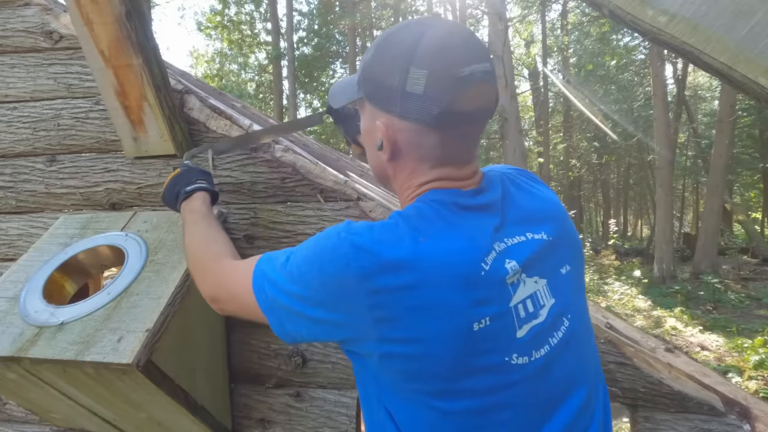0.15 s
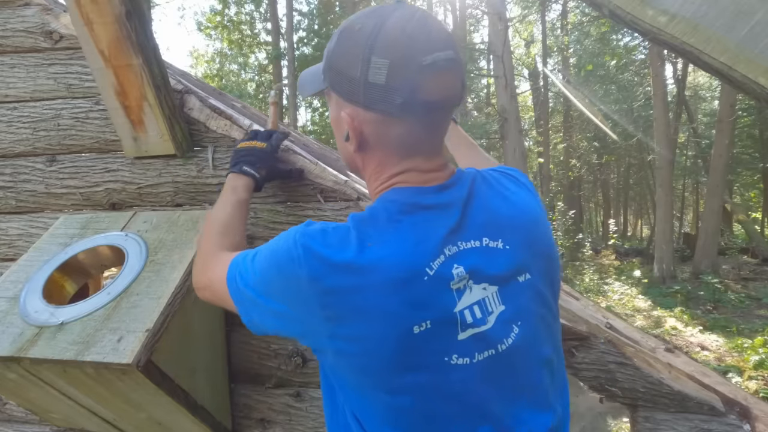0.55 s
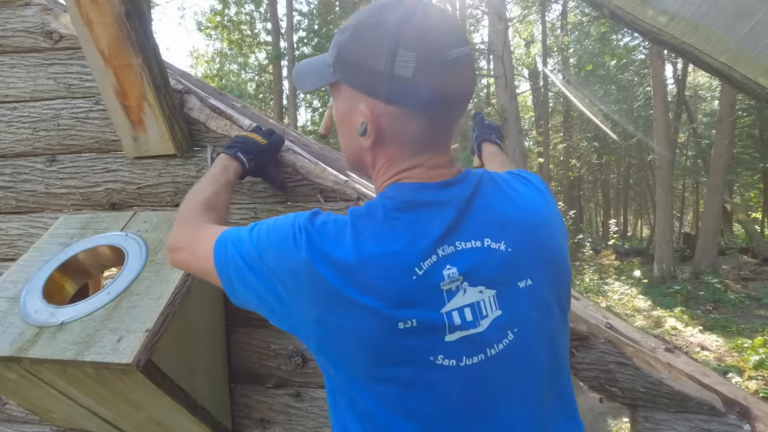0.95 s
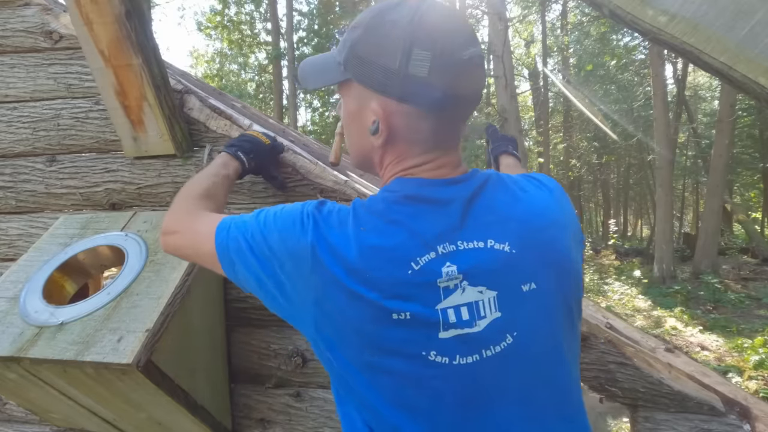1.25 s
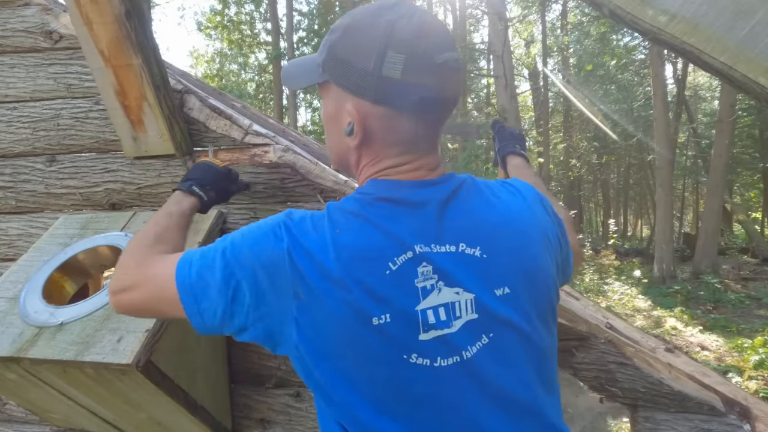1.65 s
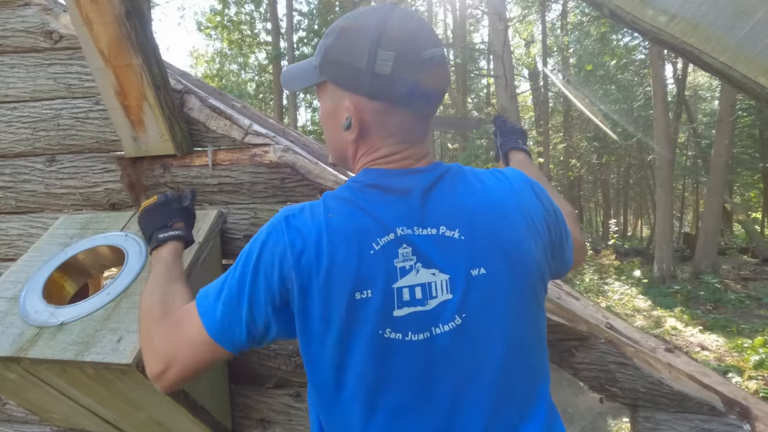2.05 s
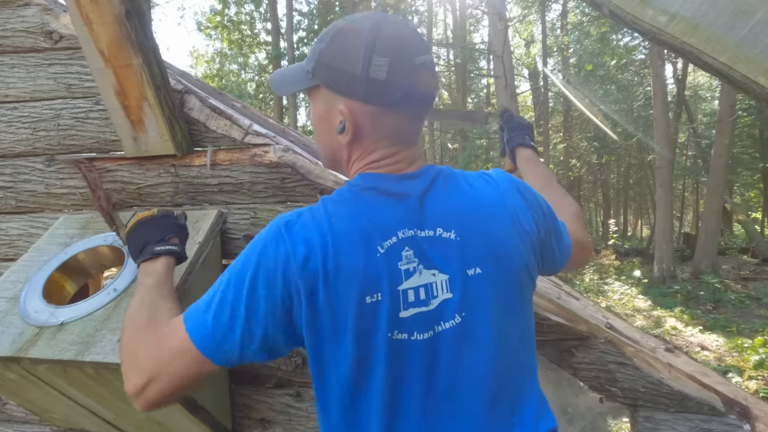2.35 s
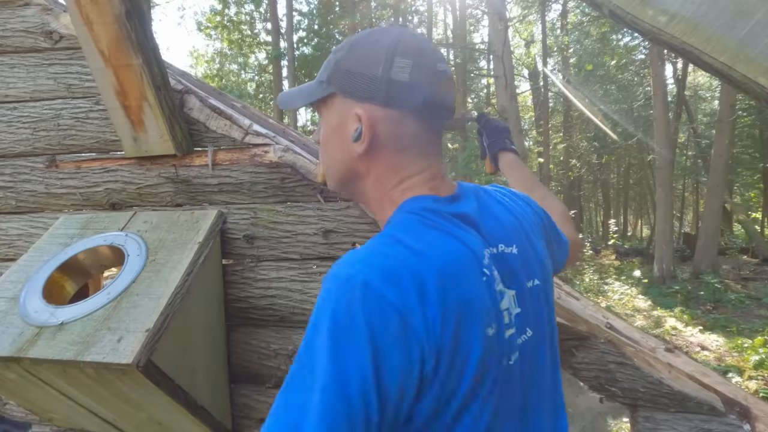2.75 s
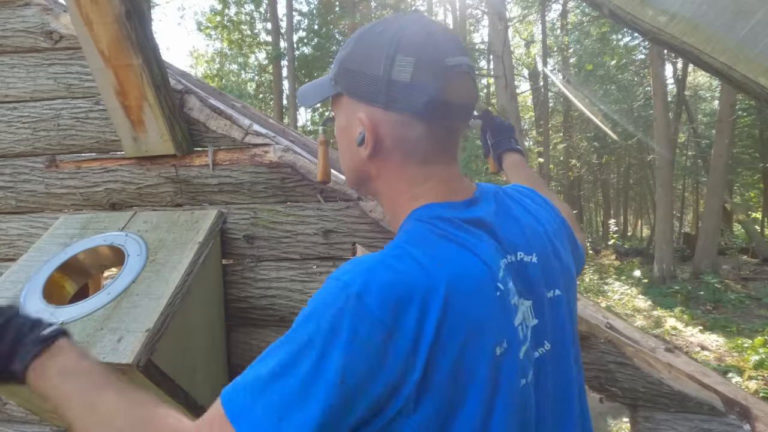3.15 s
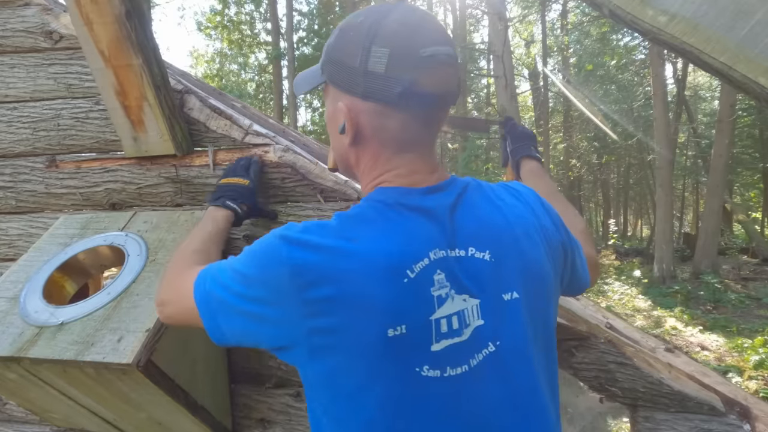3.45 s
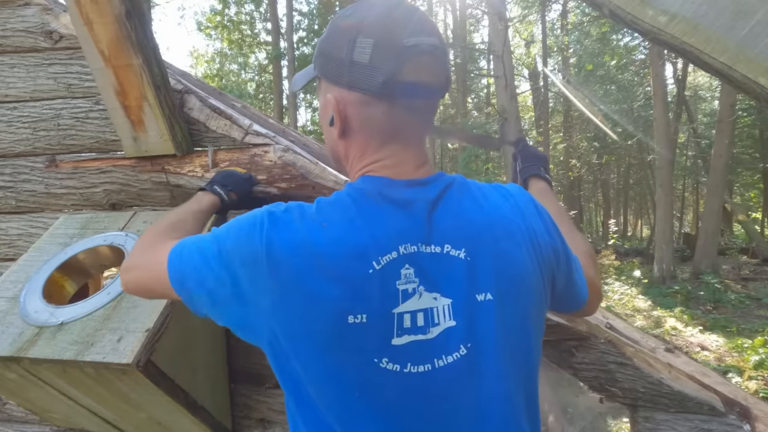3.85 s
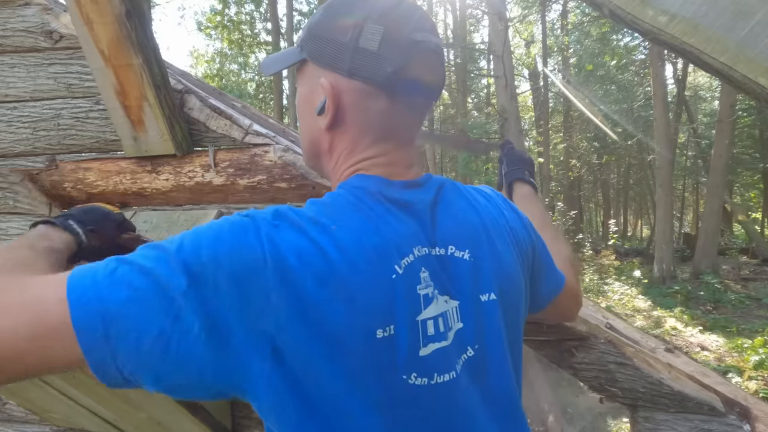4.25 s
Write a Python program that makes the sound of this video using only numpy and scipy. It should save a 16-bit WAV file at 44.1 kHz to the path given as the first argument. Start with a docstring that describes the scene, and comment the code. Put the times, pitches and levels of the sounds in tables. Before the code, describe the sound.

Gloved hands pry and tear dry bark from a log wall outdoors. Faint low creaks and small ticks come first, then clusters of sharp cracks, a big splintering rip with thuds around two seconds, one hard snap, a quieter lull, and a final dense run of loud breaks. A small camera microphone about a metre away catches it dry and close over faint leaf rustle and low rumble.

```python
"""Tearing bark off a log wall

Dry strips of bark and wood are torn by hand off a log wall in a quiet forest, a metre from a small camera.
Breaking fibres are noise bursts that excite the resonances of the strip; random grains make the dense
crackle, rustle and creak of each pull. Blows ring the logs with a sagging pitch, and rubbing grains ring
hollow modes. Shaped noise gives the faint rustle and rumble beneath; the treble mostly favours the left port.
"""
import sys
import numpy as np
from scipy import signal
from scipy.fft import rfft, irfft
from scipy.io import wavfile
from scipy.ndimage import uniform_filter1d

SR = 44100
rng = np.random.default_rng(int(sys.argv[2]) if len(sys.argv) > 2 else 0)


def digitize_waveform(pressure):
    """Quantize a signal to 16-bit integers and store it at the path in sys.argv[1].

    Rows of a 2-D input are taken as channels; values are limited to [-1, 1].
    """
    field = np.atleast_2d(pressure).T
    bounded = np.clip(field, -1, 1)
    quanta = np.round(bounded * 32767).astype(np.int16)
    wavfile.write(sys.argv[1], SR, quanta)


N = 193863  # length in samples


def undb(db):
    """Level definition: an amplitude ratio is ten to the power of dB / 20."""
    return 10 ** (np.asarray(db) / 20)


def unit(x):
    """Normalisation to a root-mean-square amplitude of one."""
    return x / np.sqrt(np.mean(x ** 2))


def curve(table):
    """Linear interpolation of a table's columns against time, one value a sample."""
    s, *columns = np.transpose(table)
    t = np.arange(N) / SR
    return [np.interp(t, s, c) for c in columns]


def shape(x, points):
    """Linear filtering in the frequency domain, through (f/Hz, level/dB) points on a log frequency axis."""
    hz, db = np.transpose(points)
    length = x.shape[-1]
    f = np.arange(length // 2 + 1) * SR / length + 1  # +1 Hz keeps the logarithm finite
    gain = undb(np.interp(np.log(f), np.log(hz), db))
    return irfft(rfft(x) * gain, length)


def ring(x, modes):
    """Modal superposition: parallel resonances of (f/Hz, bandwidth/Hz, level/dB)."""
    out = 0
    for hz, width, db in modes:
        b, a = signal.iirpeak(hz, hz / width, SR)
        out = out + undb(db) * signal.lfilter(b, a, x)
    return out


def dull(x, hz):
    """Internal damping: wood absorbs what lies well above its ring, a second-order low-pass."""
    return signal.sosfilt(signal.butter(2, hz, fs=SR, output="sos"), x)


def add(out, s, piece, db):
    """Superposition: mix a piece in at s seconds with the given peak level."""
    i = int(s * SR)
    piece = piece[:N - i]
    out[i:i + len(piece)] += piece * undb(db) / np.max(np.abs(piece))


def grains(rate, spread_db, tail_s):
    """Shot noise: random tiny breaks, rate per second, a few far louder; their power decays over tail_s."""
    loudness_db = spread_db * np.minimum(rng.exponential(size=N), 2.4)
    hits = (rng.random(N) < rate / SR) * undb(loudness_db)
    power = signal.lfilter([1], [1, -np.exp(-1 / (tail_s * SR))], hits ** 2)
    return np.sqrt(power) * rng.standard_normal(N)


# spectrum of distant leaves and air: f/Hz, relative level per Hz/dB
FOREST_SPECTRUM = [(15, -1), (25, 18), (47, 3), (97, -20.5), (153, 1), (206, -5), (659, -35.5),
                   (1290, -21.5), (3920, -26), (5730, -29.5), (9320, -49), (13200, -43), (16000, -88)]
# swell and fade of the deepest bass: t/s, gain/dB
RUMBLE_SWELL = [(0, -1.5), (.5, 3.5), (1.1, -9), (1.6, -7), (2.1, 3.5), (2.7, -3), (3.4, 3), (4.4, -11)]
FOREST_DB = -49.5  # rms level of the part common to both ports


def forest():
    """Diffuse field: coloured noise of leaves and air, with a part that differs between the ports."""
    mid, side = shape(rng.standard_normal((2, N)), FOREST_SPECTRUM)
    swell_db, = curve(RUMBLE_SWELL)
    mid = mid + (undb(swell_db) - 1) * dull(mid, 200)
    side = shape(side, [(25, -14.5), (100, -17.5), (1000, -8.5), (8000, -13.0)])
    return undb(FOREST_DB) * np.array([mid + side, mid - side]) / np.std(mid)


def sag(t, hz):
    """Falling resonance: a ring starts half again too high, sinks to hz and dies within a few cycles."""
    cycles = hz * t
    phase = 2 * np.pi * (cycles + 0.8 * (1 - np.exp(-cycles / 1.6)))
    return np.sin(phase) * np.exp(-cycles / 3)


# dull blows on the logs: t/s, peak level/dB, f/Hz
BLOWS = [(0.0, -27.5, 207), (0.01, -25.5, 53.6), (0.089, -35, 168), (0.315, -42, 190), (0.422, -38, 176),
         (0.572, -33, 60), (0.603, -30, 68.3), (1.608, -29.5, 334), (2.029, -30, 30), (2.15, -26.5, 105),
         (2.177, -20, 167), (2.24, -18, 100), (2.406, -34, 236), (2.7, -15.5, 218), (2.712, -33, 61.8),
         (2.781, -30.5, 57.3), (2.858, -29, 248), (3.08, -33.5, 170), (3.215, -36, 187), (3.749, -22, 252),
         (3.934, -25, 230), (4.032, -22, 100.5), (4.21, -35, 243)]
# resonances of a log: f/Hz, bandwidth/Hz, relative level/dB
LOG_MODES = [(55, 23, -2.5), (94.5, 5.6, -2), (154.3, 54, -4), (211.3, 29, -5), (451, 41, -14)]


def thuds():
    """Impact excitation: a soft push rings the log; the struck spot sags in pitch as the contact spreads."""
    out = np.zeros(N)
    t = np.arange(int(.25 * SR)) / SR
    for s, db, hz in BLOWS:
        push = t / .0007 * np.exp(1 - t / .0007)  # greatest after 0.7 ms
        scrape = .4 * np.exp(-t / .02) * rng.standard_normal(len(t))
        log = unit(ring(push + scrape, LOG_MODES))
        add(out, s, dull(unit(sag(t, hz)) + 0.57 * log, 770), db)
    return out


# rubs of the loosened strip: t/s, length/s, peak level/dB, f/Hz
RUBS = [(0, 0.013, -30.5, 1330), (0.095, 0.024, -28.5, 1060), (0.627, 0.032, -33, 930),
        (2.319, 0.09, -29.5, 1340), (3.929, 0.16, -21.5, 1294), (4.024, 0.051, -26, 1297)]
# hollow modes of the loosened strip: multiple of the rub's pitch, relative level/dB
HOLLOW_MODES = [(.78, -5.5), (1.001, 2), (1.169, -7), (1.4, -12), (2.2, -17)]


def groans():
    """Stick-slip friction: grains ring the hollow modes, fading as the rub ends."""
    out = np.zeros(N)
    rub = grains(1200, 1.5, .002)
    for s, length, db, hz in RUBS:
        piece = rub[int(s * SR):int((s + length) * SR)]
        piece = piece * np.geomspace(1, .03, len(piece))
        piece = np.pad(piece, (0, SR // 50))  # room for the modes to ring on
        tone = 0
        for multiple, mode_db in HOLLOW_MODES:
            f = multiple * hz
            mode = ring(ring(piece, [(f, 90, 0)]), [(f, 300, 0)])
            tone = tone + undb(mode_db) * mode
        add(out, s, tone, db)
    return out


# tugs on the strip: t/s of the peak, build-up/s, fade/s, then crackle, rustle and creak rms level/dB
TUG_EVENTS = [(0.002, .01, 0.057, -44, -79, -24), (0.109, 0.033, 0.061, -46, -74, -30.5),
              (0.199, 0.077, 0.083, -55.5, -78, -43), (0.618, 0.065, 0.12, -44.5, -67, -34.5),
              (.8, 0.11, 0.2, -62, -61.5, -53), (1.1, 0.85, 0.6, -59, -67.5, -79),
              (1.218, 0.044, 0.079, -44.5, -61, -48), (1.346, 0.075, 0.46, -44.5, -54.5, -39.5),
              (1.495, 0.1, 0.17, -46, -49.5, -55), (1.572, 0.077, 0.24, -39, -45.5, -38),
              (1.693, 0.081, 0.046, -43, -51.5, -40), (1.891, 0.078, 0.15, -50, -48, -54),
              (1.96, 0.12, 0.16, -46, -46, -56), (2.021, 0.071, 0.25, -35, -39.5, -36.5),
              (2.196, 0.16, 0.071, -30, -30.5, -29.5), (2.242, 0.01, 0.055, -34.5, -39.5, -22),
              (2.321, 0.015, 0.15, -47, -61, -44), (2.393, 0.17, 0.66, -57.5, -60.5, -53),
              (2.698, 0.031, 0.04, -33, -27, -44), (2.736, 0.097, 0.27, -48.5, -59, -35.5),
              (2.915, 0.24, 0.13, -58, -49, -40.5), (3.16, 0.89, 0.59, -62, -58, -57),
              (3.537, 0.027, 0.13, -48.5, -37.5, -42.5), (3.762, 0.17, 1, -46.5, -50, -43),
              (3.944, 0.062, 0.13, -31.5, -36, -29), (4.045, 0.14, 0.11, -36, -39.5, -35.5),
              (4.24, 0.47, 0.095, -45, -45, -39), (4.313, 0.022, 0.35, -38, -38, -38),
              (4.39, 0.13, 0.01, -25, -28, -31.5)]
# hands resting on the bark: crackle, rustle and creak rms level/dB
IDLE_LEVELS = [-100, -79.5, -68]
TUG_RANGE_DB = 25  # rise over the build-up time, fall over the fade time


def pull():
    """Exponential envelopes added as power: each tug rises and falls at a steady rate in dB."""
    t = np.arange(N) / SR
    power = undb(IDLE_LEVELS)[:, None] ** 2 * np.ones(N)
    for s, build, fade, *db in TUG_EVENTS:
        away = np.where(t < s, (s - t) / build, (t - s) / fade)
        power = power + np.outer(undb(db) ** 2, undb(-TUG_RANGE_DB * away) ** 2)
    return np.sqrt(power)  # gains of crackle, rustle and creak


SPOT_WIDTH, SPOT_DB = 0.42, -6.5  # bandwidth as a share of pitch; level of all spots against the rest


def spots(points, count):
    """Local resonance: separate spots break independently, each ringing a band of its own."""
    total = 0
    for hz in np.geomspace(points[0], points[1], count):
        band = ring(grains(45, 4.5, .0009), [(hz, SPOT_WIDTH * hz, 0)])
        total = total + band / np.sqrt(hz)  # offsets the wider bands of higher spots
    return unit(total)


# resonances of the whole strip: f/Hz, bandwidth/Hz, relative level/dB
STRIP_MODES = [(612, 49, -2), (1050, 11, -2.5), (1333, 660, -4.5), (2140, 1800, -5.5)]
# bright colour of rustle and snaps: f/Hz, level/dB
RUSTLE_COLOUR = [(2500, -15), (4000, -8.5), (7300, -10), (8300, -18.5), (12500, -21)]


def tearing():
    """Acoustic emission: countless parting fibres give wooden crackle, dry rustle and a low creak in the log."""
    crackle_gain, rustle_gain, creak_gain = pull()
    breaks = grains(260, 3.4, .0009)
    scuffs = grains(150, 3.5, .0015)
    wooden = unit(dull(ring(breaks + scuffs, STRIP_MODES), 3400))
    crackle = wooden + undb(SPOT_DB) * spots((600, 3800), count=7)
    dry_noise = unit(breaks + 0.37 * grains(480, 0.68, 0.0028))
    rustle = dry_noise + undb(SPOT_DB) * spots((2800, 13000), count=6)
    rustle = shape(rustle, RUSTLE_COLOUR)
    creak = dull(ring(grains(110, 3, .005), LOG_MODES), 520)
    return unit(crackle) * crackle_gain + unit(creak) * creak_gain + unit(rustle) * rustle_gain


# single fibres breaking: t/s, ring peak level/dB, snap peak level/dB, ring f/Hz
FIBRE_BREAKS = [(0.0955, -35, -58, 2200), (0.103, -32, -55, 2400), (0.1967, -32, -47, 544),
                (0.574, -39.5, -62, 700), (0.599, -29, -53, 2170), (0.61, -41, -63, 1470),
                (0.617, -38, -63, 3200), (0.673, -37.5, -43, 2580), (0.689, -33.5, -37.5, 3240),
                (0.811, -35.5, -61, 4040), (1.2307, -32, -40, 1640), (1.3052, -35, -41, 1610),
                (1.316, -23, -15.5, 1420), (1.3381, -13.5, -25.5, 1410), (1.375, -30, -33.5, 1770),
                (1.398, -27, -32, 1290), (1.493, -33, -36.5, 2300), (1.5553, -17, -26, 2610),
                (1.567, -15.5, -21, 1270), (1.5787, -15, -27, 2350), (1.618, -30.5, -31, 2600),
                (1.628, -34, -28, 2360), (1.676, -40, -37, 2320), (1.683, -42, -29, 3000),
                (1.7357, -31, -28, 1420), (1.7645, -94, -31, 2900), (1.953, -25.5, -24, 3030),
                (1.9621, -23.5, -23, 2770), (2.0093, -17, -34, 2400), (2.018, -27, -31, 3240),
                (2.04, -22, -37, 1320), (2.08, -31, -27, 2490.0), (2.1138, -24, -24, 1970),
                (2.128, -21, -19.5, 1830), (2.14, -19.5, -19, 1920), (2.163, -33, -24, 2300),
                (2.176, -30, -16.5, 1730), (2.1849, -9.5, -43, 616), (2.1951, -10.5, -10, 1210),
                (2.213, -21, -17, 1300), (2.2385, -14, -25.5, 1770), (2.395, -63, -30, 4110.0),
                (2.6752, -29.5, -48, 2300), (2.69, -19, -7.5, 1150), (2.697, -7.5, -33, 1060),
                (2.714, -33, -20, 3800), (2.893, -49, -28, 506), (3.1745, -41.5, -34.5, 3070),
                (3.3184, -37, -41, 1550), (3.618, -41.5, -33.5, 2940), (3.7506, -29, -56, 590),
                (3.789, -35, -38, 2000), (3.818, -18, -22, 1120), (3.857, -41, -28, 1530.0),
                (3.8763, -19, -13, 1150), (3.9207, -7.5, -11.5, 1170), (3.936, -13.5, -18, 1030),
                (4.0243, -39, -19.5, 3370), (4.134, -27, -31, 1240), (4.177, -18, -18.5, 1340),
                (4.2399, -31.5, -24, 1540), (4.256, -22, -19.5, 1630), (4.2632, -18.5, -22, 1330),
                (4.309, -15, -18, 1070), (4.332, -13, -18, 1160), (4.338, -26, -12.5, 1270),
                (4.361, -15, -12, 1140), (4.376, -5, -39, 1410)]


def cracks():
    """Impulsive excitation: splinter bursts ring the free length and whole strip; the snap is the bright edge."""
    out = np.zeros(N)
    t = np.arange(int(.1 * SR)) / SR
    for s, ring_db, snap_db, hz in FIBRE_BREAKS:
        noise = rng.standard_normal((3, len(t)))
        burst = noise[0] * np.exp(-t / 0.00041) + 0.34 * noise[1] * np.exp(-t / 0.0053)
        free_length = ring(burst, [(hz, 450, 0)])
        tone = free_length + 0.29 * ring(burst, STRIP_MODES)
        add(out, s, dull(tone, 1.62 * hz + 1500), ring_db)
        decay = np.exp(-t / .0014) + .16 * np.exp(-t / .007)
        onset = np.minimum(t / 0.00015, 1)
        add(out, s, shape(noise[2], RUSTLE_COLOUR) * decay * onset, snap_db)
    return out


# lean of the hands' treble: t/s, left minus right level/dB where the shadow filter below is at 0 dB
HAND_LEAN = [(0, -4), (1.1, 1.5), (2.1, 3.5), (3.2, 8), (3.7, 4), (4.4, 5.5)]


def scene():
    """Sum and difference stereo: a treble shadow and a random sway divide the near sound between two ports."""
    near = cracks() + tearing() + thuds() + groans()
    lean_db, = curve(HAND_LEAN)
    # the housing shadows mainly the treble, so the lean grows with pitch
    shadow = shape(near, [(250, -36), (1000, -8.0), (4000, -3.5), (10000, 1.5)])
    shadow = shadow * np.tanh(lean_db * np.log(10) / 40)
    # each break sits at another spot, so the treble leans its own way from moment to moment
    sway = uniform_filter1d(rng.standard_normal(N), SR // 900)
    sway = unit(uniform_filter1d(sway, SR // 900))
    side = shadow + sway * shape(near, [(100, -28), (1000, -22.5), (4000, -12.5), (12000, -5.5)])
    return np.array([near + side, near - side]) + forest()


# treble response of the microphone: f/Hz, level/dB
MIC_RESPONSE = [(12500, -3.5), (14500, -14), (16400, -60)]
TOP_HZ = 16300  # upper band limit


def record(dry):
    """Band limitation: the microphone fades at the top and the camera cuts it with a steep low-pass."""
    low_pass = signal.ellip(8, .2, 70, TOP_HZ, fs=SR, output="sos")
    return signal.sosfilt(low_pass, shape(dry, MIC_RESPONSE))


dry = scene()
out = record(dry)
digitize_waveform(out)
```